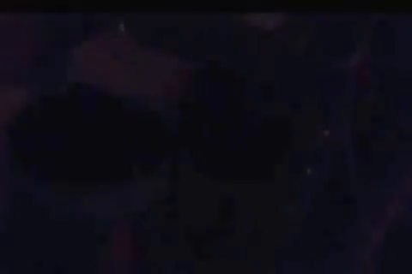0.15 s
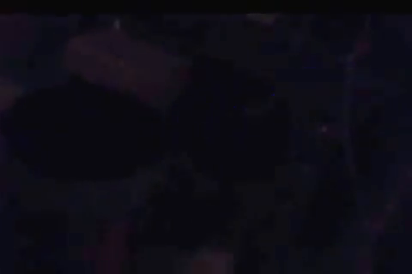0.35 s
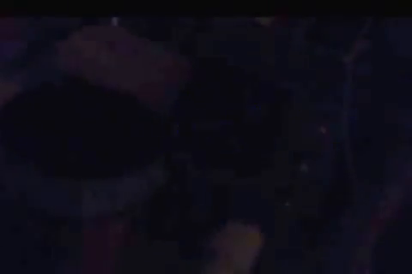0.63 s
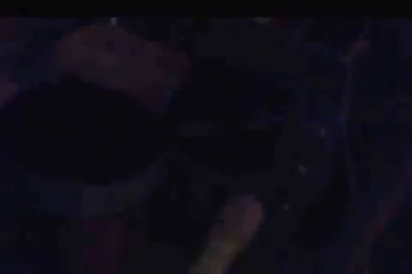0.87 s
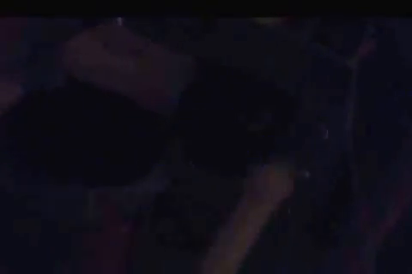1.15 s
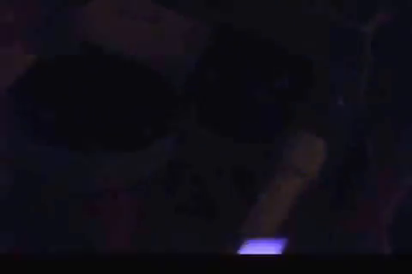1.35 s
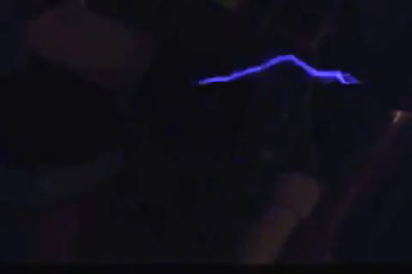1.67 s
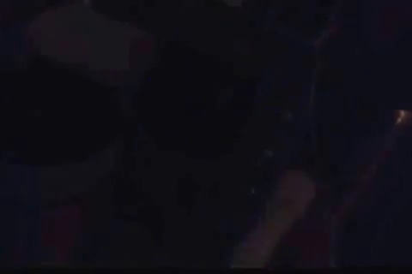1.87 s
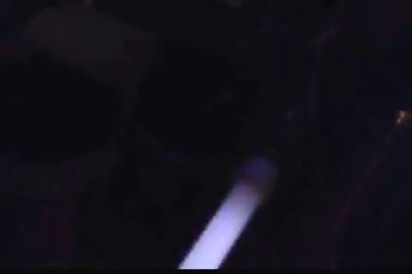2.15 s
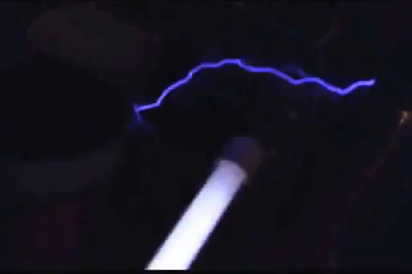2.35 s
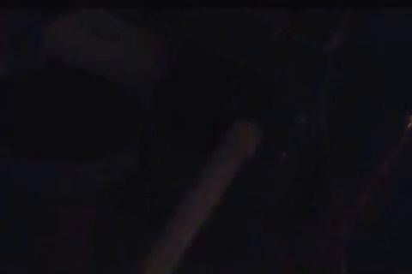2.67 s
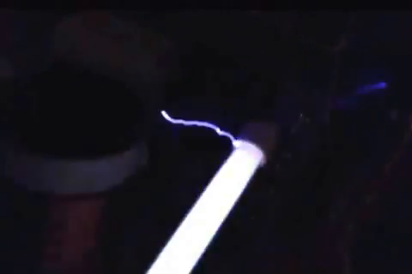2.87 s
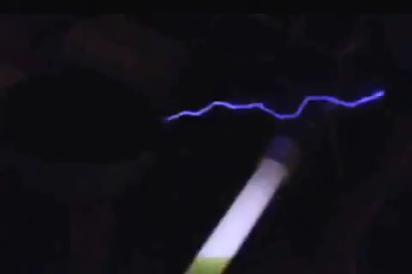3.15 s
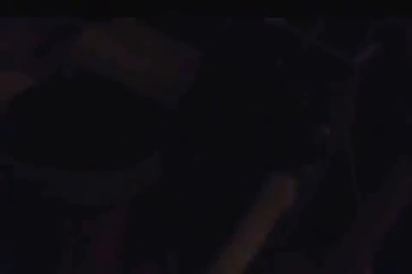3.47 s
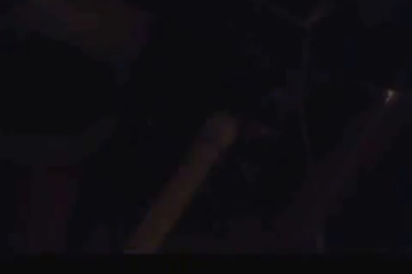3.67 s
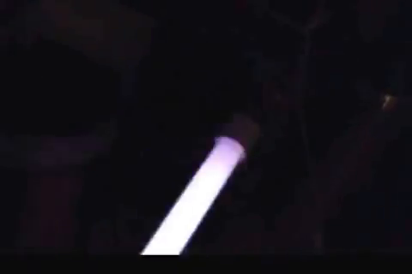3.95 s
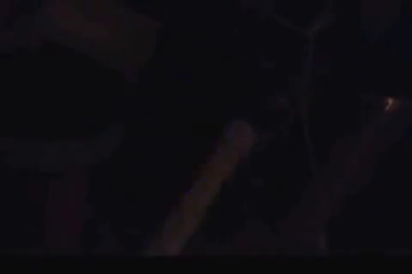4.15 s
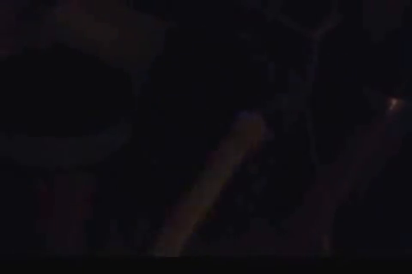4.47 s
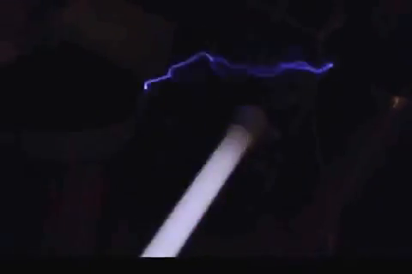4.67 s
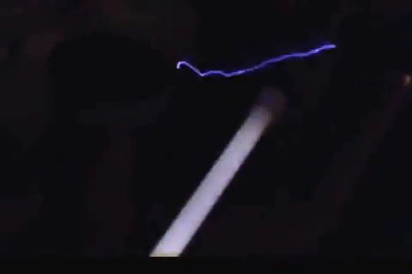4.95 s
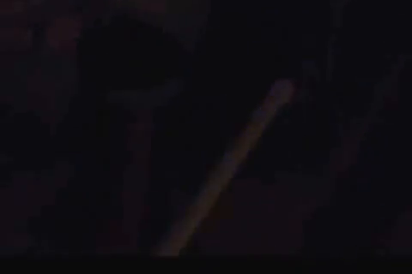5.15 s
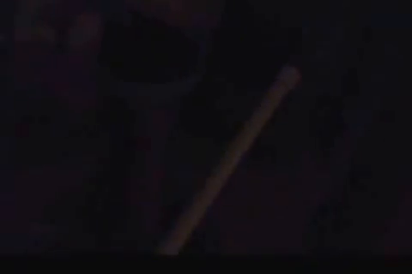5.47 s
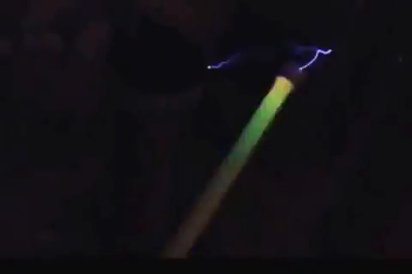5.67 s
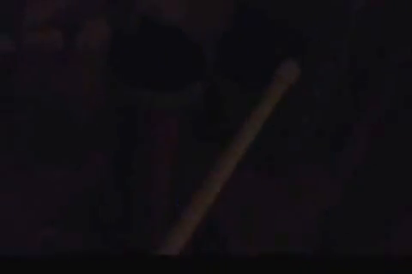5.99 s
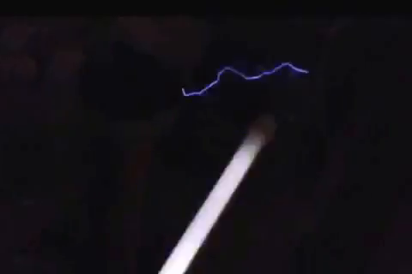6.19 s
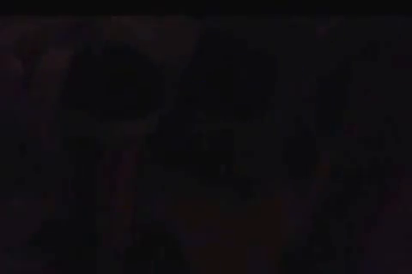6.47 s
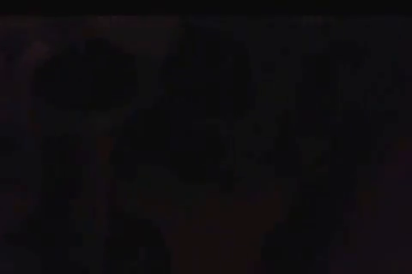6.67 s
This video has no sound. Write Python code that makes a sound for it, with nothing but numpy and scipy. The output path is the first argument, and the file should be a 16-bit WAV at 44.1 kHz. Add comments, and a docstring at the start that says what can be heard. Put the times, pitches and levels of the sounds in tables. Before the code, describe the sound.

A small high-voltage coil fires sharp, dry electrical snaps about seven times a second, close up indoors, some with a low thump.

```python
"""In a dry room, close to the microphone, a small high-voltage coil snaps about seven times a second.
Each arc sends out one sharp shock that overloads the capsule, then echoes and rings off the apparatus.
The room answers with a short tail, and a jolt in the microphone's wiring adds a low thump of varying size.
Filtered noise and one sine make the faint hiss and whine underneath."""
import sys
import numpy as np
from scipy import signal
from scipy.fft import rfft, irfft
from scipy.io import wavfile

SR = 44100
rng = np.random.default_rng(int(sys.argv[2]) if len(sys.argv) > 2 else 0)


def inscribe(sig):
    """Save sig as 16-bit PCM at rate SR to the path in sys.argv[1].

    A 1-D sig is mono; a 2-D sig holds one channel per row.
    Samples are clipped to [-1, 1] before scaling.
    """
    pcm = np.round(np.clip(np.atleast_2d(sig).T, -1, 1) * 32767)
    wavfile.write(sys.argv[1], SR, pcm.astype(np.int16))


N = 301203  # length of the scene in samples
SHOT = 8192  # samples given to one discharge

# Colour of the steady hiss: (frequency [Hz], relative level [dB])
HISS_COLOUR = [(20, -12), (70, -9), (150, 1), (300, -5), (1000, -5), (2400, 1), (5000, 0), (9000, -2),
               (15000, -4)]
# Colour of the shock front before brightening: (frequency [Hz], relative level [dB])
SHOCK_COLOUR = [(30, -38.5), (200, -40.5), (1000, -13.5), (1800, -6.5), (3200, 0), (4700, 3.5), (7000, 2.5),
                (10000, 0), (15000, -6)]
# Colour of the dense first reflections: (frequency [Hz], relative level [dB])
SCATTER_COLOUR = [(30, -17), (300, -13), (750, 4), (1150, -1.5), (1800, -5), (2300, 4.5), (3500, 2),
                  (5000, -7.5), (9000, -0.5), (15000, 1.5)]
# Colour of the room's tail: (frequency [Hz], relative level [dB])
TAIL_COLOUR = [(30, -15.5), (200, -14), (500, -9.5), (1000, -2), (1700, -1), (2400, 4.5), (4500, 4.5),
               (8000, 2), (15000, 2)]
# Colour of the low push in the wiring: (frequency [Hz], relative level [dB])
THUMP_COLOUR = [(20, -16), (65, 3.5), (200, -1), (450, -4), (750, -7.5), (1500, -16), (5000, -42.5),
                (15000, -69.5)]
# Echoes off the apparatus and bench: (mean delay [ms], level against the shock [dB])
BENCH_ECHOES = [(0.701, -33), (1.502, -17), (2.048, -24), (3.359, -16.5)]
# Decay of the room: (frequency [Hz], time to fall 60 dB [s])
ROOM_DECAY = [(150, 0.21), (700, 0.15), (2500, 0.16), (6000, 0.17), (15000, 0.14)]
# The microphone shifts among the apparatus:
# (time [s], nearest echo's delay [ms], closeness to that surface [dB], change in room level [dB])
MIC_POSITION = [(0, 0.57, -12.5, -1.5), (4.402, 0.51, -10.5, -0.5), (5.2, 0.56, -13.5, -0.5),
                (5.6, 0.41, -2.5, 1.1), (6.3, 0.36, -2.5, 1), (6.801, 0.45, -6, 0.5)]
# Brief resonances of the apparatus: (mean frequency [Hz], mean level before closeness and strength [dB])
APPARATUS_MODES = [(930, -9.5), (2330, -3), (2700, -13), (3670, -8), (4790, -8), (5400, -14.5), (5780, -13),
                   (8120, -14.5), (11900, -8), (13480, -12.5)]
# The charging runs a little fast or slow: (time [s], lag behind the steady beat [ms])
CHARGE_LAG = [(0.08, 7.3), (0.21, 3.0), (0.89, -4.1), (1.59, -3.1), (1.99, -8.8), (3.24, -7.0),
              (3.37, -9.5), (4.06, -12.8), (4.75, -8.0), (5.3, -10.2), (5.86, -4.9), (6.42, 2.5),
              (6.56, 0.8), (6.7, 3.8)]
# How hard the arcs strike as their path changes: (time [s], strength [dB])
ARC_STRENGTH = [(0.08, -7.5), (0.21, -5.5), (1.31, -9), (2.13, -3.5), (2.96, -7.5), (3.24, -4),
                (3.37, -8.5), (4.34, -7.5), (4.48, -3.6), (5.58, -0.7), (5.72, -4.0), (5.86, -1.4),
                (6.0, -5), (6.42, 0.3), (6.56, -3.5), (6.7, -1.0)]
# Discharges that jolt the wiring by a set amount: (time [s], thump level before the overall trim [dB])
WIRING_JOLTS = [(0.08, -21), (0.21, -25.5), (0.48, -20), (0.62, -5), (0.76, -31.5), (0.89, -19.5),
                (1.31, -4.5), (1.45, -22.5), (1.59, -7.5), (1.72, -4), (1.86, -13.5), (2.13, -8.5),
                (2.27, -25.5), (2.41, -15.5), (2.55, -6), (2.82, -10.5), (2.96, -5.5), (3.37, -18.5),
                (3.51, -4.5), (3.65, -10.5), (4.2, -23.5), (4.34, -2.5), (4.48, -23.5), (4.75, -26)]

FIRST_S, RECHARGE_S = 0.0701, 0.138  # steady beat before the lag: first spark, then time between sparks
WHINE_HZ = 10060
RING_T60_S = 0.023
PATH_CHANGE = 1.87  # each arc's own part of the first reflections, against the part that stays
# Treble lift of a shock front: base, added per unit of closeness gain, random spread from arc to arc
BRIGHT_DB, BRIGHT_CLOSE_DB, BRIGHT_SPREAD_DB = 1.5, 4, 3.5
# Thump of every discharge not in WIRING_JOLTS: mean before the overall trim, and random spread
FAINT_JOLT_DB, FAINT_SPREAD_DB = -44, 6
TOP_HZ = 15250  # upper limit of the finished sound


def amp(db):
    """Decibels to gain."""
    return 10 ** (np.asarray(db) / 20)


def along(points, hz):
    """Read (frequency, value) points on a log frequency axis."""
    f, v = np.transpose(points)
    return np.interp(np.log(hz + 1), np.log(f + 1), v)


def at_time(points, s):
    """Read (time, value) points at s seconds, with straight lines between them."""
    return np.interp(s, *np.transpose(points))


def unit_energy(x):
    """Scale x to a total energy of 1."""
    return x / np.linalg.norm(x)


def shot_time():
    """Seconds since the start of one discharge."""
    return np.arange(SHOT) / SR


def decay(t, t60):
    """Exponential die-away that falls 60 dB in t60 seconds."""
    return amp(-60 * t / t60)


def build_up(t, rise):
    """Smooth onset that starts from nothing, with rise in seconds."""
    return 1 - np.exp(-(t / rise) ** 2)


def pulse(colour):
    """The most compact causal (minimum-phase) pulse of this colour."""
    hz = np.fft.rfftfreq(SHOT, 1 / SR)
    cepstrum = irfft(np.log(amp(along(colour, hz))))
    # folding the cepstrum onto positive time puts the energy as early as possible
    cepstrum[1:SHOT // 2] *= 2
    cepstrum[SHOT // 2 + 1:] = 0
    return unit_energy(irfft(np.exp(rfft(cepstrum))))


def through(x, response):
    """One discharge's sound passed through an impulse response."""
    return signal.fftconvolve(x, response)[:SHOT]


def delayed(x, ms):
    """Delay x by ms milliseconds, including fractions of a sample."""
    hz = np.fft.rfftfreq(2 * SHOT, 1 / SR)
    phase = np.exp(-2j * np.pi * hz * ms / 1000)
    return irfft(rfft(x, 2 * SHOT) * phase)[:SHOT]


def add(track, s, sound):
    """Mix a sound into the track at s seconds."""
    part = track[round(s * SR):][:len(sound)]
    part += sound[:len(part)]


def background():
    """Faint steady hiss from coloured noise, and a thin electronic whine from one sine."""
    noise = rng.standard_normal(N + SHOT)
    hiss = signal.fftconvolve(noise, pulse(HISS_COLOUR))[SHOT:SHOT + N]
    whine = np.sin(2 * np.pi * WHINE_HZ * np.arange(N) / SR)
    return amp(-74) * hiss + amp(-81) * whine


def discharges():
    """The coil fires each time it has charged: the moments of all sparks, in seconds."""
    beat = np.arange(FIRST_S, N / SR, RECHARGE_S)
    return beat + at_time(CHARGE_LAG, beat) / 1000


def brightened(x, db):
    """A shorter shock front has more treble: a shelf that turns around 8 kHz."""
    hz = np.fft.rfftfreq(2 * SHOT, 1 / SR)
    shelf = 1 + (amp(db) - 1) * (1j * hz / (8000 + 1j * hz)) ** 2
    return irfft(rfft(x, 2 * SHOT) * shelf)[:SHOT]


def scatter(surfaces, t60, rise):
    """Dense first reflections: the surfaces stay put, but every arc takes a new crooked path."""
    t = shot_time()
    paths = surfaces + PATH_CHANGE * rng.standard_normal(SHOT)
    return unit_energy(paths * decay(t, t60) * build_up(t, rise))


def ringing(spread_db):
    """The apparatus rings briefly as decaying sines, a little differently for each arc."""
    t, ring = shot_time(), np.zeros(SHOT)
    for hz, db in APPARATUS_MODES:
        drift = 1 + 0.005 * rng.normal()
        level = amp(db + spread_db * rng.normal())
        tone = np.sin(2 * np.pi * hz * drift * t)
        ring += level * unit_energy(tone * decay(t, RING_T60_S))
    return ring


def room_tail(rise):
    """A fresh diffuse tail of noise in which each frequency dies at its own speed."""
    hz, t, z = signal.stft(rng.standard_normal(SHOT), SR, nperseg=256)
    t60 = along(ROOM_DECAY, hz)[:, None]
    tail = signal.istft(z * decay(t, t60), SR, nperseg=256)[1][:SHOT]
    return unit_energy(tail * build_up(shot_time(), rise))


def sparks(shock_db, near_db, scatter_db, room_db, wander_ms):
    """Each arc sends out one sharp shock, heard directly, off nearby surfaces and through the room."""
    track, surfaces = np.zeros(N), rng.standard_normal(SHOT)
    front, scatter_colour, tail_colour = pulse(SHOCK_COLOUR), pulse(SCATTER_COLOUR), pulse(TAIL_COLOUR)
    times, near_ms, closeness_db, share_db = np.transpose(MIC_POSITION)
    for s in discharges():
        strength = amp(at_time(ARC_STRENGTH, s))
        closeness = amp(np.interp(s, times, closeness_db))
        bright_db = BRIGHT_DB + BRIGHT_CLOSE_DB * closeness + BRIGHT_SPREAD_DB * rng.normal()
        shock = amp(shock_db) * brightened(front, bright_db)
        near = closeness * amp(near_db) * delayed(shock, np.interp(s, times, near_ms))
        # the arc changes place, so its bench echoes shift in time
        bench = np.zeros(SHOT)
        for ms, echo_db in BENCH_ECHOES:
            bench += amp(echo_db) * delayed(shock, ms + wander_ms * rng.normal())
        reflections = scatter(surfaces, t60=0.023, rise=0.00026)
        early = amp(scatter_db) * through(reflections, scatter_colour)
        tail_db = room_db + np.interp(s, times, share_db)
        late = amp(tail_db) * through(room_tail(rise=0.0042), tail_colour)
        ring = closeness * ringing(spread_db=2.5)
        add(track, s, strength * (shock + near + bench + early + late + ring))
    return track


def microphone(pressure, top, low_cut_hz):
    """The shock fronts saturate the small capsule, which passes little bass."""
    flattened = top * np.tanh(pressure / top)
    low_cut = signal.butter(1, low_cut_hz, "highpass", fs=SR, output="sos")
    return signal.sosfilt(low_cut, flattened)


def thumps(level_db, swing_db, swing_hz, swing_t60):
    """A discharge jolts the microphone's wiring: one low push that swings back and settles unevenly."""
    track, push, t = np.zeros(N), pulse(THUMP_COLOUR), shot_time()
    swing = unit_energy(np.cos(2 * np.pi * swing_hz * t) * decay(t, swing_t60))
    fade = np.exp(-(t / 0.02) ** 2)
    moments = discharges()
    sizes_db = FAINT_JOLT_DB + FAINT_SPREAD_DB * rng.standard_normal(len(moments))
    # each listed jolt goes to the nearest discharge
    for s, db in WIRING_JOLTS:
        sizes_db[np.argmin(np.abs(moments - s))] = db
    for s, db in zip(moments, sizes_db):
        # the uneven settling is noise that swells, then dies
        flutter = unit_energy(rng.standard_normal(SHOT) * t * decay(t, 0.025))
        settling = amp(-8) * through(flutter, push)
        jolt = fade * (push + amp(swing_db) * swing + settling)
        add(track, s, -amp(db + level_db) * unit_energy(jolt))  # the push goes negative
    return track


def scene():
    """The coil over the quiet of the room, in mono; the thumps enter the wiring behind the capsule."""
    quiet = background()
    arcs = sparks(shock_db=11.5, near_db=-20.5, scatter_db=2, room_db=-5.0, wander_ms=0.1)
    snaps = microphone(arcs, top=0.61, low_cut_hz=458)
    jolts = thumps(level_db=0.5, swing_db=-12.5, swing_hz=430, swing_t60=0.021)
    return (snaps + jolts + quiet)[None]


def record(dry):
    """A steep low-pass, run both ways to keep the timing, removes the extreme treble."""
    low_pass = signal.butter(24, TOP_HZ, fs=SR, output="sos")
    return signal.sosfiltfilt(low_pass, dry)


dry = scene()
out = record(dry)
inscribe(out)
```